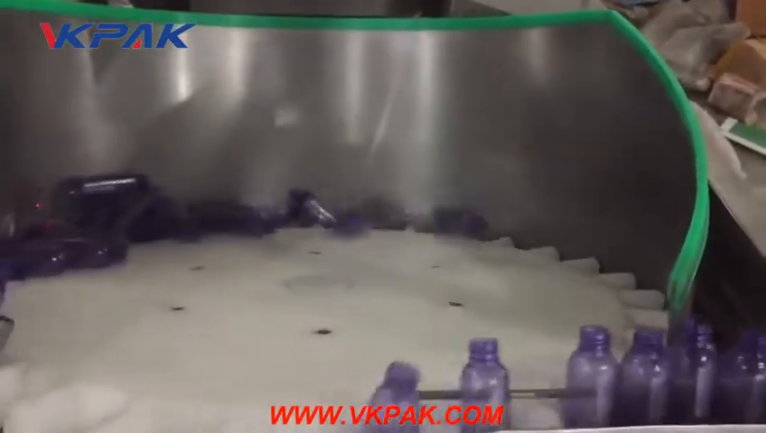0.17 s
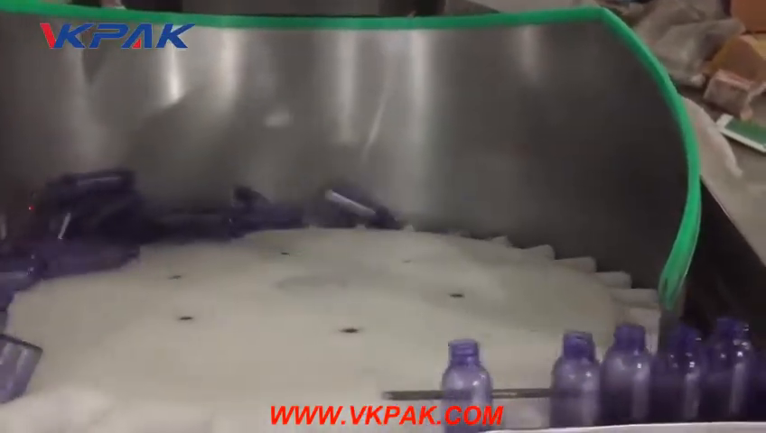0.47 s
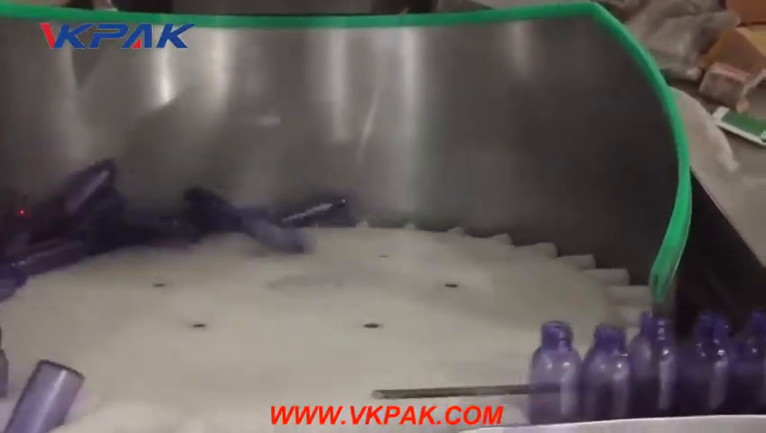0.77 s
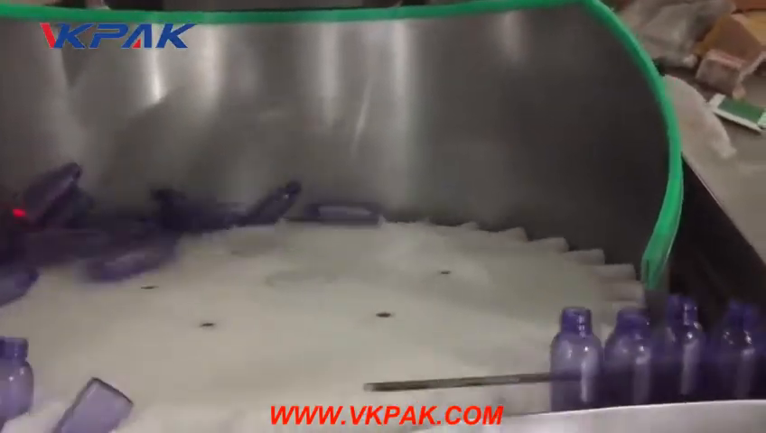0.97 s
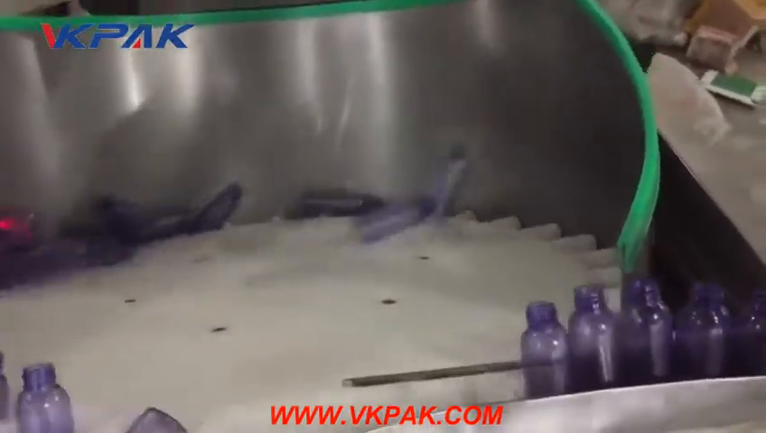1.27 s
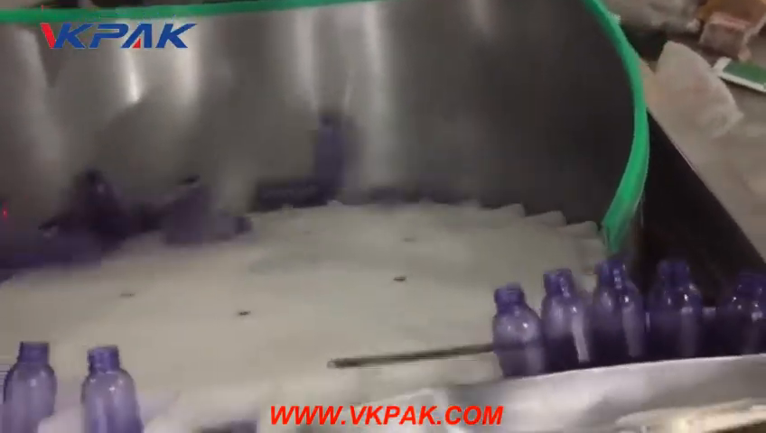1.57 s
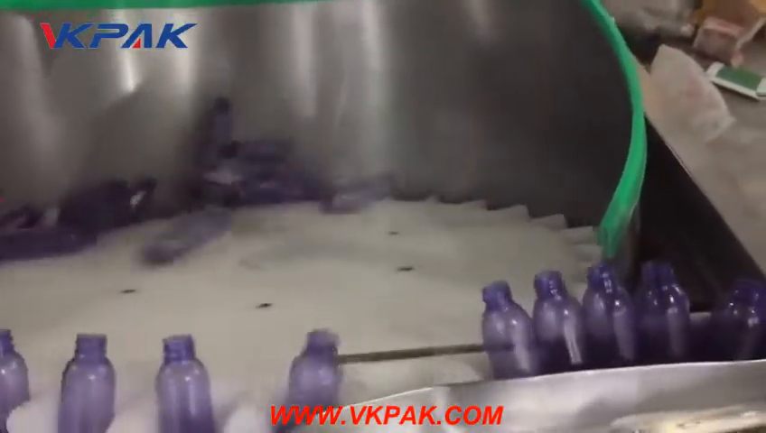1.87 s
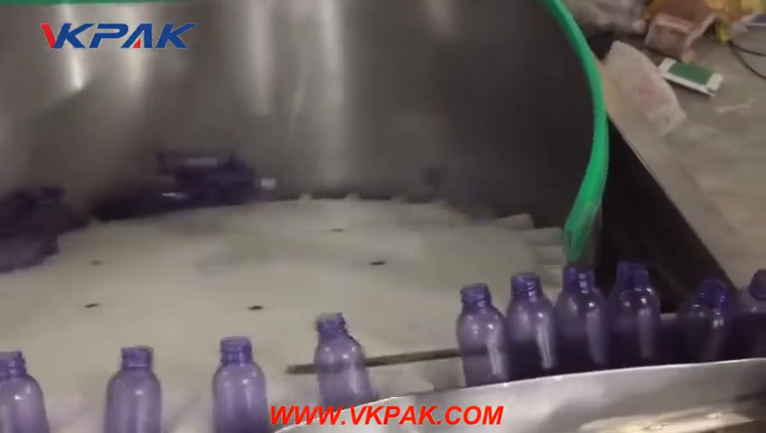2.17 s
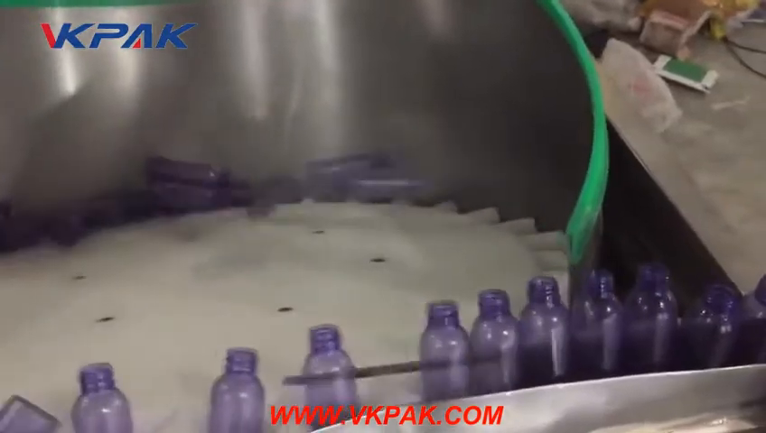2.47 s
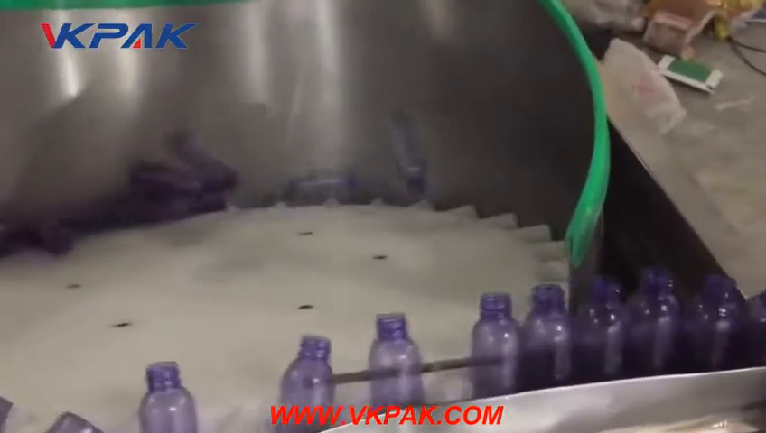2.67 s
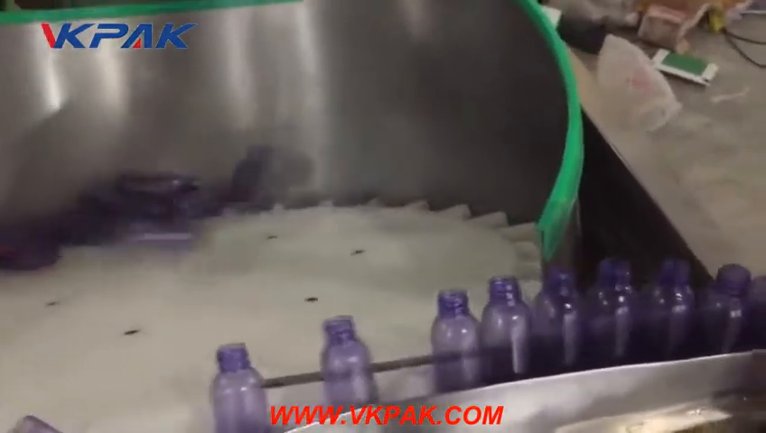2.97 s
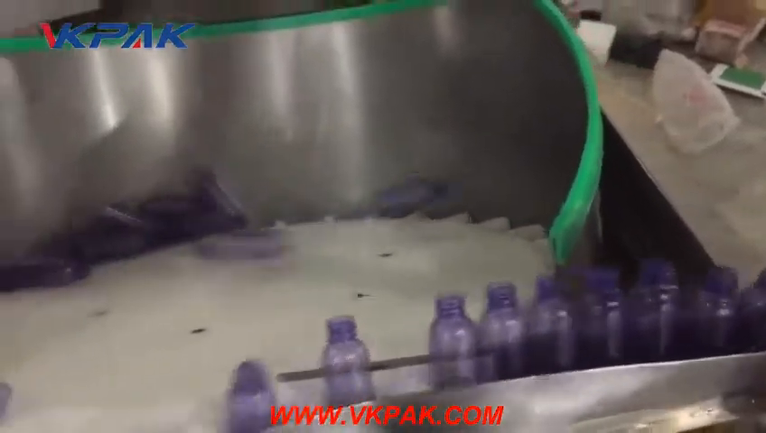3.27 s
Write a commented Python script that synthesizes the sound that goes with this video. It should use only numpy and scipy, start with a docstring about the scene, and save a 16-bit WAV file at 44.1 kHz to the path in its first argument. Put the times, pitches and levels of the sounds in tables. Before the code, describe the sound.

Plastic bottle knocks and rattling patter on sheet steel, with constant air-jet hiss and factory drone

```python
"""Plastic bottles knock against the steel wall of a factory sorting bowl, which rings briefly: each blow
adds fading wall tones, ringing noise, a neck tone, a crack and a tick. Smaller random blows patter along.
Air jets hiss as coloured noise, bottle mouths hoot as sagging tones, and machines hum as noise and tones.
One microphone, narrow band, both channels alike. Brief narrow gaps are cut into the treble of the whole mix."""
import sys
import numpy as np
from scipy import signal
from scipy.fft import rfft, irfft, next_fast_len
from scipy.io import wavfile
from scipy.ndimage import uniform_filter1d, map_coordinates

SR = 44100
rng = np.random.default_rng(int(sys.argv[2]) if len(sys.argv) > 2 else 0)


def undo_db(level):
    """Turn decibels back into plain size, where 20 dB means ten times bigger."""
    steps = np.asarray(level, float) / 20
    return 10 ** steps


def waveform_to_disk(signal):
    """Save audio, clipped to [-1, 1], as 16-bit WAV at the path in sys.argv[1]."""
    frames = np.transpose(np.atleast_2d(signal))
    scaled = np.clip(frames, -1, 1) * 32767
    samples = np.round(scaled).astype(np.int16)
    wavfile.write(sys.argv[1], SR, samples)


N = 150381  # length in samples

# Broad noise of machines and hall: (frequency [Hz], relative level [dB per Hz])
DRONE_COLOUR = [(13, -54.5), (22, -21.5), (128, -4.5), (203, -4), (252, -8), (334, -5), (398, -6.5),
                (643, -3), (816, -8), (1750, -9.5), (4000, -18), (5200, -40), (8800, -120)]
# Motor tones: (frequency [Hz], middle level [dB], slow phase wander [radians])
MOTOR_TONES = [(66.4, -45.5, 1.1), (117.2, -40, 0.51), (144.3, -39.5, 0.32), (197, -43, 0.63),
               (337.8, -45.5, 0.63), (628, -46.5, 1.1), (722, -45.5, 1.2)]
# Loudness of the air jets: (time [s], level [dB])
JET_LEVEL = [(0.0, -25.5), (0.34, -26), (1.08, -25), (1.46, -24.5), (1.75, -26.5), (3.0, -25.5),
             (3.41, -27)]
# Colour of the air hiss: (frequency [Hz], relative level [dB per Hz])
JET_COLOUR = [(1760, -23), (3000, -8.5), (3480, -8), (3840, -7), (4840, -7.5), (5380, -7), (7610, -5.5),
              (8630, -3.5), (9230, -3.5), (9500, -3), (12400, -48.5), (20900, -120)]
# Air blown across a bottle mouth: (start [s], length [s], starting frequency [Hz], middle level [dB])
MOUTH_HOOTS = [(.62, .2, 540, -30.5), (1.02, .11, 538, -30), (2.64, .12, 548, -34), (0.0, .09, 545, -33)]
# Loudness of the small random knocks, before TUMBLE_DB: (time [s], relative level [dB])
TUMBLE_LEVEL = [(0.0, -28), (0.78, -31.5), (1.01, -21), (1.16, -68.5), (1.36, -23), (1.56, -27),
                (1.74, -25.5), (2.21, -23.5), (2.35, -22), (2.57, -39), (2.69, -21.5), (3.1, -34.5),
                (3.28, -26.5), (3.41, -25.5)]
# Bottles hitting the wall: (time [s], level before BLOW_DB [dB], brightness [dB per octave],
# neck ring level within the blow [dB], neck frequency [Hz], time for the wall's low tones to fall 60 dB [s])
WALL_KNOCKS = [(.004,-12.5,-3,-16,3500,0.51),(.034,-11,-5,-1,3500,0.29),(.175,-8,-8.5,4,3500,0.21),(.209,-14,1,-8,3500,0.35),(.32,-9,-4.5,-22,3500,.18),(.407,-14.5,-15.5,-13,3500,0.13),(.434,-16.5,4.5,-8,3500,0.3),(.576,-15,-4.5,-5,3500,0.35),(.805,-11.5,-0.5,-4.5,3500,0.21),(1.073,-2,2.5,-3.5,2950,0.27),(1.154,-18,-10.5,-17,3500,.19),(1.41,-19.5,-8,5,3500,0.58),(1.457,-2.5,4,-21,3400,0.27),(1.56,-15.5,2.5,-15,3500,0.51),(1.591,-9.5,0.5,-5,3000,0.33),(1.699,-5.5,8.5,-3,3200,0.12),(1.719,-13,2,2.5,3550,0.078),(1.779,-20.5,2.5,-15,3500,0.12),(1.83,-9,2.5,-13,3500,0.18),(1.843,-12,7,-10,3500,0.34),(1.871,-9,-0.5,0,3200,.2),(1.91,-18.5,-0.5,5,3550,0.11),(1.933,-14,-4.5,0,3300,0.28),(2.055,-3.5,4,2.5,3450,0.24),(2.060,-10,-4.5,0,3290,0.17),(2.079,-6.5,7.5,-20,3500,0.25),(2.331,-1.5,3,-5.5,3450,0.18),(2.517,-14.5,-5,-12,3500,0.68),(2.659,-12.5,3,0,3150,0.16),(2.675,-6,-5.5,-7,3500,0.25),(2.699,-11,-0.5,-1.5,3100,0.39),(2.724,-5.5,1.5,0,3400,0.25),(2.851,-10.5,21.5,-10,3300,0.23),(2.925,-21.5,3,-25,3500,0.3),(3.046,-9.5,3,-4,3000,0.4),(3.08,-11.5,-1.5,-6,3500,0.31),(3.149,-16,-2.5,-13,3500,.28),(3.373,-12,-15.5,-15,3500,0.16)]
# Strongest tones of the steel wall: (frequency [Hz], relative level [dB])
WALL_MODES = [(552, -9.5), (870, -1.5), (1118, -1), (1194, -2), (1276, -0.5), (1445, -10), (1670, 5),
              (1830, 3.5), (1990, 3.5), (2060, 2), (2220, 4), (2350, 6.5), (2650, -9.5), (2950, -0.5)]
# The wall's countless weak tones: (frequency [Hz], relative level [dB per Hz])
WALL_DENSE = [(300, -30.5), (500, -14.5), (800, -7.5), (1200, -2.5), (1500, -4), (2100, 0.5), (2600, -4),
              (3600, -12), (4100, -18), (8000, -15.5), (12000, -29)]
# Threshold for gaps in the mix, higher means more gaps: (frequency [Hz], threshold [standard deviations])
GAPS_BY_PITCH = [(2000, -2.5), (3500, -1.77), (4900, 0.02), (5400, -0.96), (6600, -0.5), (7600, 0.2),
                 (8300, -0.5), (9000, -1)]
# Shift of that threshold over time: (time [s], shift [standard deviations])
GAPS_BY_TIME = [(0, -0.7), (.6, -0.94), (.75, .25), (2.4, 0.59), (2.9, -0.64), (3.41, -0.69)]

# Background: levels in dB, phase wander in radians, pitch fall in Hz per second
DRONE_DB, HUM_ROUGH = -28.5, 0.4
HOOT_SAG_HZ_PER_S, HOOT_ROUGH, HOOT_FLUTTER_DB = 150, 0.55, 2.5
# Small knocks: average number a second, spread of size, fall time by 60 dB, level shift
TUMBLE_PER_S, TUMBLE_SPREAD_DB, TUMBLE_T60_S, TUMBLE_DB = 110, 3, 0.13, -5.5
# Blows: level shift, onset time, frequency where brightness changes nothing
BLOW_DB, RISE_S, PIVOT_HZ = -11.5, 0.00036, 1700
# Wall tones: their share, random spread, phase wander in radians and its speed; share of the dense ring
MODES_DB, MODE_SCATTER_DB, MODE_WAVER, WAVER_PER_S, DENSE_DB = 1.5, 8, 0.34, 40, 1
TREBLE_T60_SHARE = 0.62  # fall time at 3 kHz over fall time at 1.5 kHz
NECK_WIDTH_HZ, NECK_T60_S = 340, 0.069
# Sharp start of a blow: a noise crack and a tick at the first contact; TICK_HZ rises with brightness
CRACK_DB, CRACK_T60_S, TICK_DB, TICK_HZ, TICK_T60_S = 6, 0.0053, 0.5, 2600, 0.0085
RATTLE_DB, RATTLE_PER_S = 2.4, 200  # the bottle chatters: spread and speed of the random gain
GAP_DB = -31.5  # gain in the deepest gaps
# Band edge, level above it, final cutoff, overload ceiling (full scale = 1) and sharpness of its bend
EDGE_HZ, SHELF_DB, TOP_HZ, CEILING, KNEE = 9640, -46, 10330, 0.95, 4


def unit(x):
    """Scale to an rms (average strength) of 1."""
    return x / np.sqrt(np.mean(x ** 2) + 1e-20)


def along(points, hz):
    """Read (frequency [Hz], value) points on a log frequency axis."""
    f, value = np.transpose(points)
    return np.interp(np.log(hz + 1), np.log(f + 1), value)


def curve(rows):
    """Join (time [s], value) rows into one value per sample."""
    s, value = np.transpose(rows)
    return np.interp(np.arange(N) / SR, s, value)


def wobble(rate):
    """A smooth random curve with rate random points a second."""
    return map_coordinates(rng.standard_normal(N // 64), [np.arange(N) * rate / SR])


def filtered(x, response):
    """Make each frequency of x louder or softer by response(frequency)."""
    size = x.shape[-1]
    padded = next_fast_len(size + 8192)
    gain = response(np.fft.rfftfreq(padded, 1 / SR))
    return irfft(rfft(x, padded) * gain, padded)[..., :size]


def smooth_field(shape, across_hz, across_time):
    """A random map over frequency and time, smoothed both ways."""
    field = uniform_filter1d(rng.standard_normal(shape), size=across_hz, axis=0)
    return unit(uniform_filter1d(field, size=across_time, axis=1))


def rush(spectrum, patchy_db):
    """Coloured noise of rms 1 with patches of random gain."""
    z = signal.stft(rng.standard_normal(N), nperseg=512)[2]
    patches = undo_db(patchy_db * smooth_field(z.shape, 6, 8))
    noise = signal.istft(z * patches, nperseg=512)[1][:N]
    return unit(filtered(noise, lambda hz: undo_db(along(spectrum, hz))))


def narrow(hz, width_hz, size):
    """Noise in a narrow band around hz, rms 1."""
    return unit(filtered(rng.standard_normal(size), lambda f: 1 / (1 + ((f - hz) / width_hz * 2) ** 2)))


def machines():
    """Broad drone with motor tones whose loudness and phase are slightly unsteady."""
    t = np.arange(N) / SR
    hum = np.zeros(N)
    for hz, db, wander in MOTOR_TONES:
        level = undo_db(db + 2.06 * wobble(6.95)) * np.sqrt(2)  # a sine's peak is sqrt(2) times its rms
        phase = 2 * np.pi * hz * t + wander * wobble(9) + HUM_ROUGH * wobble(27.88)
        hum += level * np.sin(phase)
    return undo_db(DRONE_DB) * rush(DRONE_COLOUR, patchy_db=2.7) + hum


def jets():
    """Compressed air hisses as noise, with a random flutter as bottles cross the streams."""
    flutter_db = 0.6 * wobble(14) + 0.26 * wobble(40)
    return undo_db(curve(JET_LEVEL) + flutter_db) * rush(JET_COLOUR, patchy_db=2.1)


def hoots():
    """Bottle mouths passing a jet sound breathy tones that swell, fade and sag in pitch."""
    out = np.zeros(N)
    for s, length, hz, db in MOUTH_HOOTS:
        u = np.clip(np.arange(N) / SR - s, 0, length)  # time since the hoot began
        sagging = 2 * np.pi * (hz * u - HOOT_SAG_HZ_PER_S * u ** 2 / 2)
        phase = sagging + HOOT_ROUGH * wobble(45)
        level = undo_db(db + HOOT_FLUTTER_DB * wobble(30)) * np.sqrt(2)
        out += level * np.sin(np.pi * u / length) * np.sin(phase)
    return out


def wall_modes(t, colour_db, life):
    """The wall's strongest tones, each randomly shifted, scaled and wavering, fading at its own pace."""
    hz, db = np.transpose(WALL_MODES)
    draw = rng.standard_normal((3, len(hz)))
    gain = undo_db(db + colour_db(hz) + MODE_SCATTER_DB * draw[0])
    hz = hz * (1 + 0.0066 * draw[1])
    knots = rng.standard_normal((len(hz), 64))
    waver = MODE_WAVER * np.array([np.interp(t * WAVER_PER_S, np.arange(64), row) for row in knots])
    phase = 2 * np.pi * (hz[:, None] * t + draw[2][:, None]) + waver
    fade = undo_db(-60 * t / life(hz)[:, None])
    return (gain / np.linalg.norm(gain)) @ (fade * np.sin(phase))


def dense_ring(t, tone, t60, treble_t60):
    """The wall's countless weak tones as noise, with the treble fading faster."""
    low, high = rng.standard_normal((2, len(t)))
    treble_share = lambda f: np.clip(np.log2((f + 1) / 1500), 0, 1)
    scale = np.std(filtered(low, tone))
    low_part = filtered(low, lambda f: tone(f) * np.sqrt(1 - treble_share(f)))
    high_part = filtered(high, lambda f: tone(f) * np.sqrt(treble_share(f)))
    return (low_part * undo_db(-60 * t / t60) + high_part * undo_db(-60 * t / treble_t60)) / scale


def knock(bright_db, neck_db, neck_hz, t60):
    """One blow: ringing wall, brighter for harder contact, the bottle's neck tone, a crack and a tick."""
    t = np.arange(SR // 3) / SR
    colour_db = lambda f: bright_db * np.log2(np.clip(f, 850, 3600) / PIVOT_HZ)
    life = lambda f: t60 * TREBLE_T60_SHARE ** np.clip(np.log2((f + 1) / 1500), 0, 3)
    tone = lambda f: undo_db(along(WALL_DENSE, f) + colour_db(f))
    modes = wall_modes(t, colour_db, life)
    dense = dense_ring(t, tone, t60, life(3000))
    neck_sound = np.sin(2 * np.pi * neck_hz * t) + 0.69 * narrow(neck_hz, NECK_WIDTH_HZ, size=len(t))
    neck = undo_db(neck_db - 60 * t / NECK_T60_S) * neck_sound
    crack = undo_db(CRACK_DB - 60 * t / CRACK_T60_S) * unit(filtered(rng.standard_normal(len(t)), tone))
    tick_hz = TICK_HZ * undo_db(bright_db / 2)
    tick = undo_db(TICK_DB - 60 * t / TICK_T60_S) * np.sin(2 * np.pi * tick_hz * t)
    rattle_db = RATTLE_DB * np.interp(t * RATTLE_PER_S, np.arange(128), rng.standard_normal(128))
    wall = undo_db(rattle_db) * (undo_db(MODES_DB) * modes + undo_db(DENSE_DB) * dense)
    return (wall + neck + crack + tick) * (1 - np.exp(-t / RISE_S))


def tumbling(count=8):
    """A random patter of small blows, each through one of a few rings of the wall."""
    rows = rng.random((900, 3))
    at = np.cumsum(-np.log(rows[:, 0] + 1e-9)) / TUMBLE_PER_S * SR  # random gaps, in samples
    size = undo_db(-TUMBLE_SPREAD_DB * np.log(rows[:, 1] + 0.039))  # many small, few large
    which = (rows[:, 2] * count).astype(int)
    keep = at < N
    blows = np.zeros((count, N))
    blows[which[keep], at[keep].astype(int)] = size[keep]
    brightness = np.linspace(-4.5, 2.5, num=count)
    rings = np.array([knock(db, neck_db=-7.5, neck_hz=3400, t60=TUMBLE_T60_S) for db in brightness])
    patter = signal.fftconvolve(blows, rings, axes=1).sum(0)[:N]
    return undo_db(curve(TUMBLE_LEVEL) + TUMBLE_DB) * unit(patter)


def knocks():
    """The loud single blows of bottles on the wall, each placed at its own time."""
    out = np.zeros(N + SR)
    for s, db, *kind in WALL_KNOCKS:
        start = max(round(s * SR), 0)
        out[start:start + SR // 3] += undo_db(db + BLOW_DB) * knock(*kind)
    return out[:N]


def treble_gaps(x):
    """Turns down narrow strips of the finished mix briefly, where a random map is below a threshold."""
    hz, t, z = signal.stft(x, SR, nperseg=1024)
    field = smooth_field(z.shape, 3, 7)
    limit = along(GAPS_BY_PITCH, hz)[:, None] + np.interp(t, *np.transpose(GAPS_BY_TIME))
    limit = limit - 9 * (hz < 2000)[:, None]  # practically spares the lower sounds
    depth = np.clip((limit - field) / 0.3, 0, 1)
    return signal.istft(z * undo_db(GAP_DB * depth), SR, nperseg=1024)[1][:N]


def scene():
    """All sources add up at one microphone; the mix gets its treble gaps and fills two channels."""
    mix = machines() + jets() + hoots() + tumbling() + knocks()
    return np.tile(treble_gaps(mix), (2, 1))


def band_limit(x):
    """A steep low-pass at the top of the band."""
    return signal.sosfilt(signal.butter(12, 10890, fs=SR, output="sos"), x)


def record(dry):
    """Limit the band with a weak shelf above it, bend the loudest peaks softly, then cut the top."""
    x = filtered(dry, lambda hz: np.where(hz < EDGE_HZ, 1, undo_db(SHELF_DB)))
    x = x / (1 + np.abs(x / CEILING) ** KNEE) ** (1 / KNEE)
    x = filtered(x, lambda hz: hz < TOP_HZ)
    return band_limit(x)


dry = scene()
out = record(dry)
waveform_to_disk(out)
```